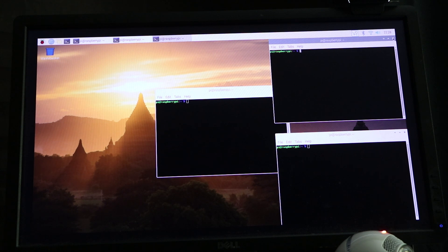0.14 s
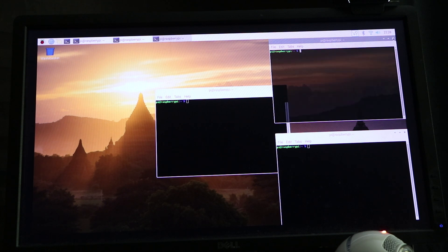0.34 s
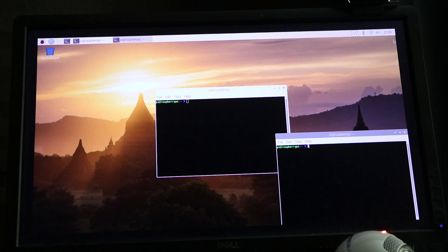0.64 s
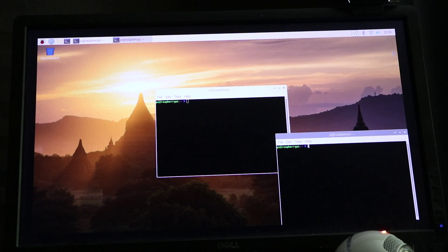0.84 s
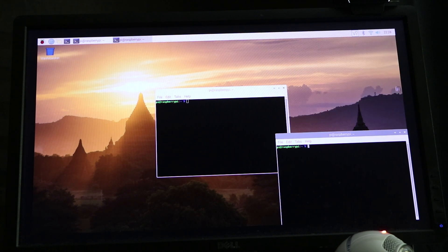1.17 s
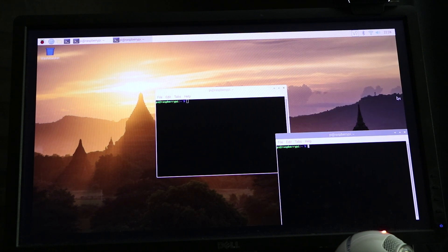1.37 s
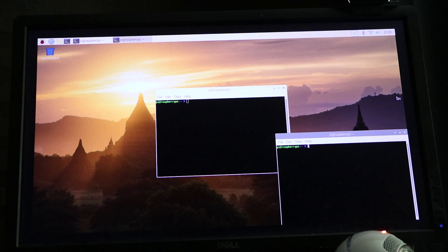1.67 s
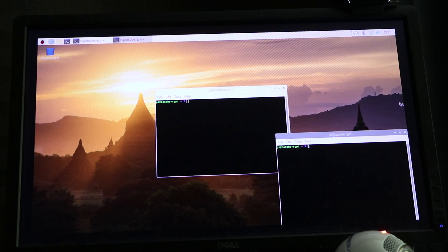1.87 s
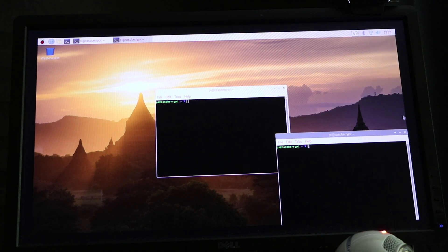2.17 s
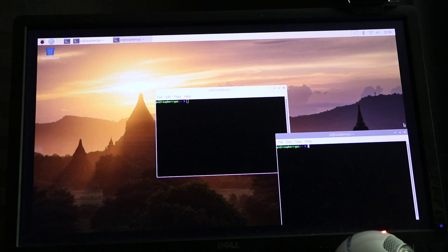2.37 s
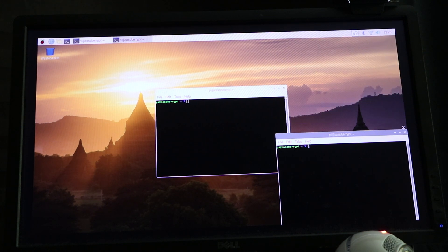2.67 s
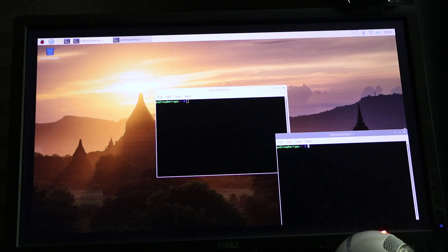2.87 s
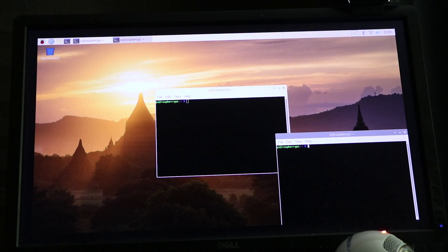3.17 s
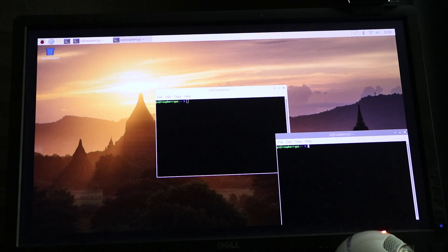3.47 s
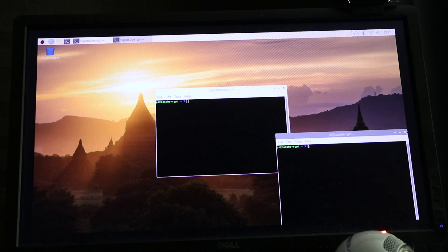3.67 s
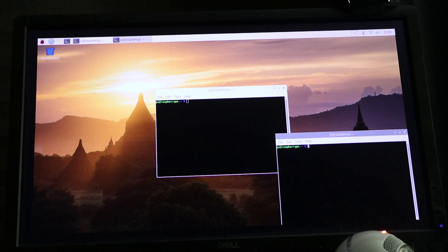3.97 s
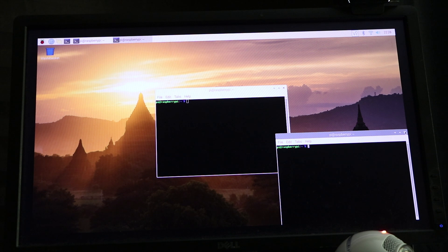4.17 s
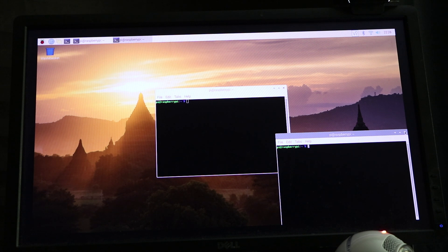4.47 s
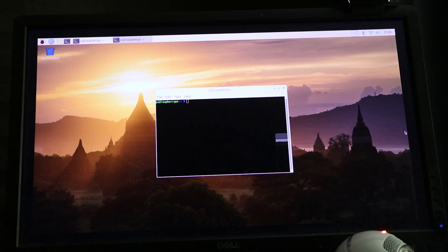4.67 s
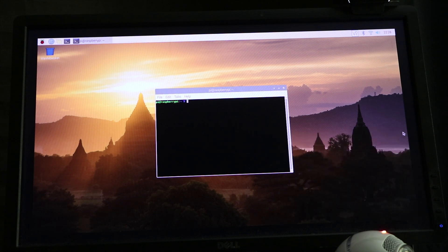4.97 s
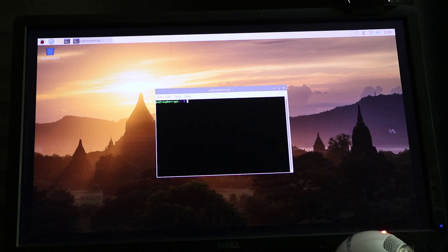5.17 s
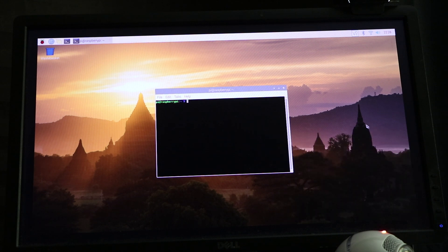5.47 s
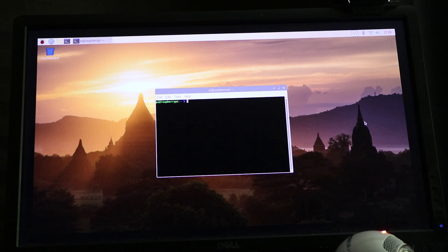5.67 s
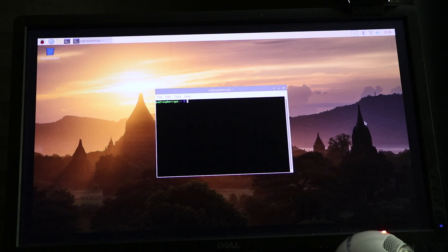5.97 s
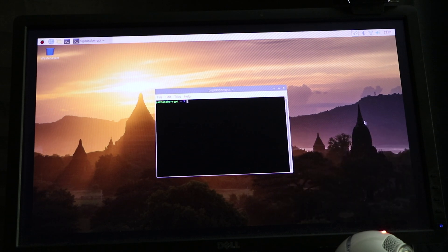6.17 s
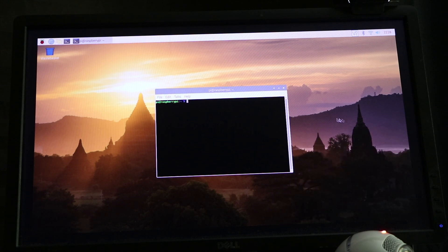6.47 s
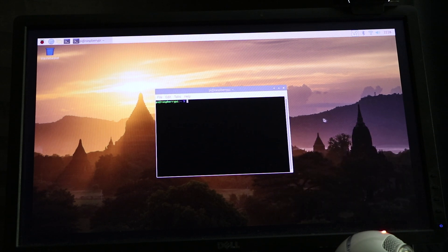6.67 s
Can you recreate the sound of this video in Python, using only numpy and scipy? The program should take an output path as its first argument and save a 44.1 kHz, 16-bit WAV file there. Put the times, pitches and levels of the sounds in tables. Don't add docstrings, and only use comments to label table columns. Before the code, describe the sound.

Close by and to the right, a mouse button snaps down and back. The mouse then scrapes briskly over a wooden desk and lands with a cluster of hollow, rattling knocks. After a calm pause comes a second click, then softer slides and lighter bumps. A small stereo microphone also catches faint fan hum, low air puffs, room murmur and hiss.

```python
import sys
import numpy as np
from scipy import signal
from scipy.fft import rfft, irfft, next_fast_len
from scipy.io import wavfile
from scipy.ndimage import uniform_filter1d

SR = 44100
rng = np.random.default_rng(int(sys.argv[2]) if len(sys.argv) > 2 else 0)


def natural_amplitude(level_db):
    exponent = np.asarray(level_db, float) / 20
    return 10 ** exponent


def dump_mix(stems):
    frames = np.atleast_2d(stems).T
    limited = np.clip(frames, -1, 1)
    pcm = np.round(limited * 32767).astype(np.int16)
    wavfile.write(sys.argv[1], SR, pcm)


N = 300938

# frequency [Hz], level [dB], decay time t60 [s].
DESK_MODES = [(95.8, -19.5, 0.22), (141.4, -10, 0.17), (187, -8, 0.18), (239.8, 0.5, 0.23),
              (259, -5.5, 0.094), (302.2, -2, 0.22), (366, 5, 0.066), (413.5, -1.5, 0.16), (459, 1.5, 0.12),
              (519, 3, 0.062), (600, 1.5, 0.077), (653, -4, 0.093), (724.5, 0, 0.099), (800, -8.5, 0.13),
              (874, -1, 0.056), (944, -22, 0.054)]


def evened(x):
    return x / np.sqrt(np.mean(x ** 2) + 1e-20)


def read(points, hz):
    f, value = np.transpose(points)
    return np.interp(np.log(hz + 1), np.log(f + 1), value)


def coloured(x, points):
    length = x.shape[-1]
    size = next_fast_len(length)
    gain = natural_amplitude(read(points, np.fft.rfftfreq(size, 1 / SR)))
    return irfft(rfft(x, size) * gain, size)[..., :length]


def whitened(x, size=3):
    spectrum = rfft(x, 2 * len(x))
    power = uniform_filter1d(abs(spectrum) ** 2, size=size)
    return irfft(spectrum / power ** .5)[:len(x)]


def add(mix, s, sound):
    part = mix[..., round(s * SR):][..., :sound.shape[-1]]
    part += sound[..., :part.shape[-1]]


def ring(modes, seconds, spread=0.):
    t = np.arange(round(seconds * SR)) / SR
    hz, db, t60 = np.transpose(modes)[:, :, None]
    phase = np.pi * np.arange(len(hz))[:, None]
    phase = phase + spread * rng.standard_normal(hz.shape)
    swing = np.sin(2 * np.pi * hz * t + phase) - np.sin(phase) * np.exp(-hz * t)
    x = (natural_amplitude(db - 60 * t / t60) * swing).sum(0)
    return x / abs(x).max()


def burst(seconds, t60, spiky=1.59):
    t = np.arange(round(seconds * SR)) / SR
    x = rng.standard_normal(len(t))
    x *= abs(x) ** spiky * natural_amplitude(-60 * t / t60)
    return x / np.linalg.norm(x)


def air(spectrum, db, patchy_db):
    # frequency [Hz], correlation [-1 to 1].
    likeness = [(60, 0.3), (150, 0.87), (380, 0.89), (950, 0.75), (2380, 0.11), (5980, 0.01),
                (15000, 0.0675)]
    # frequency [Hz], left over right [dB].
    balance = [(60, 1.0), (150, 1.0), (380, 2.9), (950, 1.16), (2380, 0.95), (5980, 1.3), (15000, 1.1)]
    frames, hz = N // 512 + 5, np.fft.rfftfreq(2048, 1 / SR)
    a, b, c, d, patches = rng.standard_normal((frames, 1025, 5)).T
    patches = evened(uniform_filter1d(uniform_filter1d(patches, 20, 0), 8, 1))
    same = np.clip(read(likeness, hz), -1, 1)[:, None]
    left = a + 1j * b
    right = same * left + np.sqrt(1 - same ** 2) * (c + 1j * d)
    right = right * np.exp(2j * np.pi * hz * 3.97 / SR)[:, None]
    lean = natural_amplitude(read(balance, hz) / 2)[:, None]
    z = np.array([left * lean, right / lean])
    z = z * natural_amplitude(read(spectrum, hz)[:, None] + patchy_db * patches)
    x = signal.istft(z, nperseg=2048, noverlap=1536)[1][:, :N]
    return natural_amplitude(db) * x / np.sqrt(np.mean(x.mean(0) ** 2))


def room_tone():
    # frequency [Hz], density [dB per Hz].
    murmur = [(41, -37.5), (70, -9), (199, -3), (230, -0.5), (321, -7.5), (411, -1.5), (542, -7.5),
              (648, -3.5), (693, -16.5), (724, 3.5), (783, -10.5), (1000, -11.5), (1300, -32), (2200, -120)]
    return air(murmur, -50.5, patchy_db=0.64)


def recorder_hiss():
    # frequency [Hz], density [dB per Hz].
    self_noise = [(590, -18), (1000, -4), (1060, -5), (1160, -2.5), (1620, -9), (1860, -11.5),
                  (3080, -16.5), (4970, -24.5), (6820, -20), (10100, -20), (15100, -28.5), (15800, -29),
                  (16400, -50)]
    # frequency [Hz], gain [dB].
    upper_edge = [(15750, 0), (15900, -60)]
    return coloured(air(self_noise, -57.5, patchy_db=0.29), upper_edge)


def fan():
    # frequency [Hz], width [Hz], level [dB].
    tones = [(757, 19, -66), (418, 37, -66), (301, 34, -62), (186, 24, -74.5), (139.6, 14, -61.5),
             (10500, 60, -86)]
    t, out = np.arange(N) / SR, np.zeros((2, N))
    for hz, width, db in tones:
        r = np.exp(-np.pi * width / SR)
        noise = rng.standard_normal(N) + 1j * rng.standard_normal(N)
        wobble = signal.lfilter([1], [1, -r], noise)
        tone = evened((wobble * np.exp(2j * np.pi * hz * t)).real)
        out += natural_amplitude(db) * np.array([np.roll(tone, 4), 0.935 * tone])
    return out


def draught():
    # peak time [s], level [dB].
    gusts = [
        (0.42, -66),
        (1.77, -70),
        (3.1, -65),
        (3.45, -76),
        (3.85, -60),
        (4.27, -64),
        (5.4, -68),
        (6.15, -70),
        (6.8, -70),
    ]
    calm_db, fade_db_per_s = -80, 54.5
    lumps = rng.standard_normal((2, N)) + 1.1 * rng.standard_normal(N)
    lumps = coloured(lumps, [(15, -33), (30, 1), (45, 6), (65, -1), (120, -63)])
    t = np.arange(N) / SR
    swell = sum(natural_amplitude(db - fade_db_per_s * abs(t - s)) for s, db in gusts)
    return evened(lumps) * (natural_amplitude(calm_db) + swell)


def stroke(t, s, rise, hold, fall, db):
    rest_db = -24
    slack = np.maximum((s - t) / rise, (t - s - hold) / fall)
    return db + rest_db * np.maximum(slack, 0)


def slides():
    # full speed reached [s], speeding up [s], holding [s],
    # slowing down [s], scrape level at full speed [dB].
    strokes = [
        (0.789, 0.27, 0.25, 0.33, -55.5),
        (5.14, .17, .02, 1, -62.5),
        (5.64, .1, 0.052, 0.0335, -64.5),
        (5.96, .2, 0.0088, .03, -72),
        (6.50, 0.44, 0.016, .2, -55),
        (6.76, 0.62, 0.009, .15, -62),
    ]
    # frequency [Hz], density [dB per Hz].
    scrape_colour = [(710, -33), (1200, 3.5), (1520, -7), (1700, 0), (2040, -0.5), (3450, -0.5),
                     (5000, -14), (6500, -43.5), (11000, -120)]
    # frequency [Hz], density [dB per Hz].
    hiss_colour = [(2650, -27), (4500, -3), (6190, 1.5), (7610, 2), (11500, -5), (15100, -13), (16000, -20)]
    slips = rng.standard_normal((3, N)) * natural_amplitude(2.5 * rng.exponential(1, (3, N)))
    slips *= natural_amplitude(2.0 * evened(uniform_filter1d(rng.standard_normal(N), 500)))
    scrape = evened(coloured(slips[0], scrape_colour))
    hiss = evened(coloured(slips[1], hiss_colour))
    rumble = evened(signal.oaconvolve(slips[2], ring(DESK_MODES, .3, spread=2.88))[:N])
    t = np.arange(N) / SR
    db = np.max([stroke(t, *row) for row in strokes], axis=0)
    pace_db = np.clip(db + 56, -25, 5)
    mix = natural_amplitude(5.0) * scrape + natural_amplitude(-1.0 + 0.1 * pace_db) * hiss + natural_amplitude(5.5 - 0.1 * pace_db) * rumble
    return natural_amplitude(db) * mix


def knocks():
    # start [s], thud level [dB], clack over thud [dB],
    # tick over clack [dB], settling time [ms].
    landings = [(1.2420, -38.5, -11, -12, 42), (1.2580, -36, -19, -12, 31), (1.6900, -28, -2.5, -11.5, 79),
                (1.7040, -21.5, -18.5, 3.5, 65), (1.712, -15.5, -9, -3.5, 46),
                (1.7966, -16.5, -11, -4.5, 38), (5.2550, -44, -20, -18, 53), (5.9830, -26.5, -16, -5, 42),
                (6.1900, -47.5, -11.5, -13, 31), (6.5160, -34.5, -15.5, -13, 32),
                (6.578, -36.5, -19, -11, 33), (6.756, -44.5, -13.5, -11.5, 27), (6.1040, -46, -13, -14, 30)]
    # frequency [Hz], level [dB], decay time t60 [s].
    base_modes = [(1045, -4.5, 0.0081), (1250, 1.5, 0.0091), (1580, -4.5, 0.0098), (1765, -4.5, 0.014),
                  (2080, -0.5, 0.0071), (2230, 1.5, 0.0081), (2630, 0.5, 0.006), (3250, -7, 0.0076),
                  (3270, -7, 0.0094), (3790, -2, 0.0038), (5200, -25, 0.0017)]
    tick_colour = [(2000, -3), (4500, 5.5), (8000, 1.5), (11000, -6.0), (16000, -21)]  # Hz, dB
    lead = 64
    out = np.zeros(N)
    for s, thud_db, clack_db, tick_db, settle_ms in landings:
        tilt_db = 1.02 * (clack_db + 13)
        board = [(hz, db + tilt_db * np.log2(hz / 400), t60) for hz, db, t60 in DESK_MODES]
        thud = ring(board, .4, spread=1.34)
        thud *= 1 - 0.77 * np.exp(-np.arange(len(thud)) / (0.003 * SR))

        rattle = burst(0.28, settle_ms / 1000 + 0.0088, spiky=0.76)
        rattle[0] += .25
        clack = np.convolve(whitened(rattle, size=25), ring(base_modes, .05, spread=0.36))

        contact = 1.3 * whitened(burst(0.0029, 0.025, spiky=0.95))
        settling = settle_ms / 70 * burst(0.084, 0.029, spiky=1.0)
        tick = coloured(np.concatenate([np.zeros(lead), contact, settling]), tick_colour)

        add(out, s, natural_amplitude(thud_db + 6.0) * thud / abs(thud).max())
        add(out, s, natural_amplitude(thud_db + clack_db + 15.5) * clack / abs(clack).max())
        add(out, s - lead / SR, natural_amplitude(thud_db + clack_db + tick_db + 18.5) * tick / abs(tick).max())
    return out


def switch():
    # start [s], level [dB], bounce delay [ms], bounce [dB], chatter [dB].
    snaps = [
        (0.04, -28, 3.0, 7, 0),
        (0.2655, -25.5, 2.87, -14, 7),
        (4.3599, -29.5, 2.8, 2.5, 2),
        (4.57, -25, 4.1, -6.5, 3),
        (6.559, -39, 4.3, 0, 2),
    ]
    kinds = [0, 1, 0, 1, 2]
    # frequency [Hz], level [dB], decay time t60 [s].
    shells = [
        [(1900, -15, .002), (2900, -10, 0.0023), (4200, -5, 0.0022), (5670, -9, 0.0041), (6900, -1, 0.0076),
         (7540, -3, 0.0058), (8300, -10, 0.0056), (10350, -3, 0.0052), (13000, -11, .003), (15330, -11, 0.0028)],
        [(2300, -15, .002), (3330, -6.5, 0.0022), (4800, -8, 0.002), (6230, 0, 0.0023), (7480, 0, 0.0057),
         (8820, 1, 0.0065), (10000, -0.5, 0.0034), (10810, 1, 0.0047), (13350, -10, 0.0026),
         (14900, -13, 0.00274)],
        [(5440, -12, .025), (7000, -6, .003), (8950, -4, .003), (10960, -4, .003), (13000, -7, .003)],
    ]
    out = np.zeros(N)
    for (s, db, gap_ms, bounce_db, chatter_db), kind in zip(snaps, kinds):
        drive = natural_amplitude(chatter_db) * burst(0.0051, 0.064, spiky=1.0)
        add(drive, 0, 1.12 * burst(0.002, 0.021, spiky=0.32))
        add(drive, gap_ms / 1000, natural_amplitude(bounce_db) * burst(.001, 0.00138))
        drive = whitened(drive)
        drive[0] += .45
        snap = np.convolve(drive, ring(shells[kind], .04, spread=0.15))
        add(out, s, natural_amplitude(db + 6.0) * snap / abs(snap).max())
    return out


def ports(x):
    # frequency [Hz], gain [dB].
    shadow = [(200, 1), (700, -0.5), (2000, -13), (5000, -21), (12000, -28)]
    return np.array([np.roll(coloured(x, shadow), 10), x])


def room(x):
    # frequency [Hz], decay time t60 [s].
    decay = [(200, 0.45), (800, 0.3), (2500, 0.24), (6000, 0.2), (10000, .2), (15000, 0.23)]
    taps = np.zeros((2, SR // 2))
    at = np.arange(200, SR // 2 - 20, 20) + rng.integers(0, 20, (2, (SR // 2 - 201) // 20))
    np.put_along_axis(taps, at, rng.choice([-1., 1.], at.shape), 1)
    taps[1] = taps[0] + coloured(taps[1] - taps[0], [(150, -15.0), (500, -7.0), (1500, 0.5)])
    taps[1] *= natural_amplitude(-1.5)
    hz, t, z = signal.stft(taps, SR, nperseg=256)
    tail = signal.istft(z * natural_amplitude(-60 * t / read(decay, hz)[:, None]), SR, nperseg=256)[1]
    return signal.fftconvolve(x[None], tail / np.linalg.norm(tail[0]), axes=1)[:, :N]


def scene():
    # frequency [Hz], gain [dB].
    near_colour = [(15, -36), (40, -29), (90, -13.5), (150, -2), (220, -1), (16200, 1.5), (16400, -60)]
    click, knock, slide = switch(), knocks(), slides()
    echoes = room(natural_amplitude(-6.5) * click + natural_amplitude(-5.0) * knock + natural_amplitude(-3.5) * slide)
    near = coloured(ports(click + knock + slide) + echoes, near_colour)
    return near + room_tone() + recorder_hiss() + fan() + draught()


def band_limit(x):
    return signal.sosfilt(signal.butter(12, 16630, fs=SR, output="sos"), x)


def record(dry):
    return band_limit(dry)


dry = scene()
out = record(dry)
dump_mix(out)
```